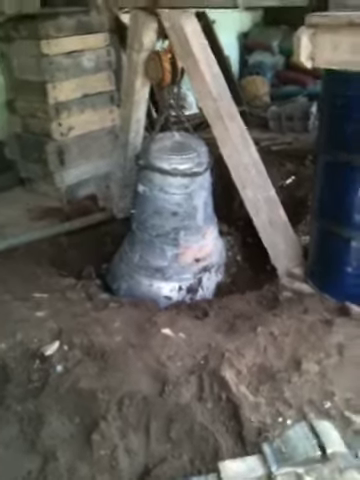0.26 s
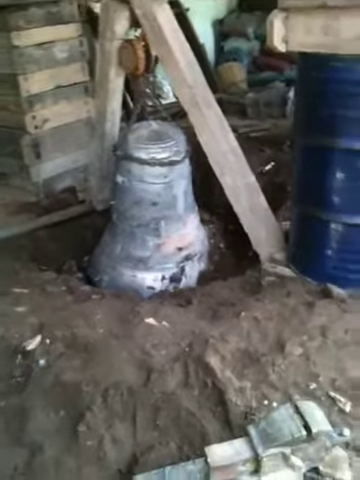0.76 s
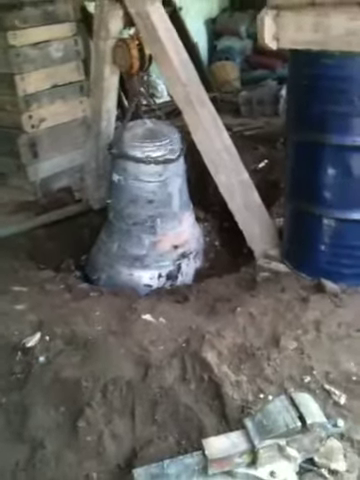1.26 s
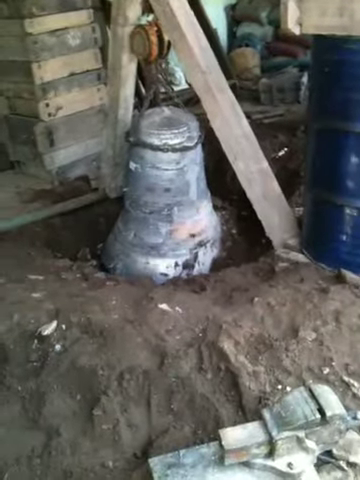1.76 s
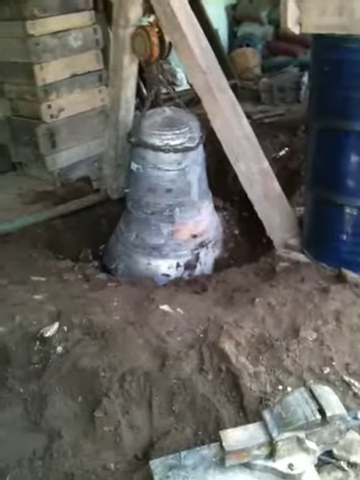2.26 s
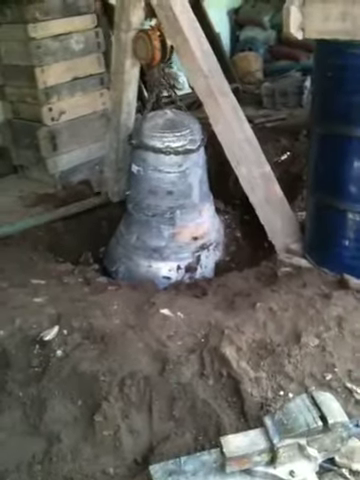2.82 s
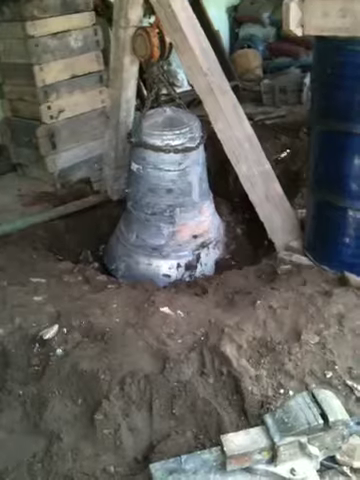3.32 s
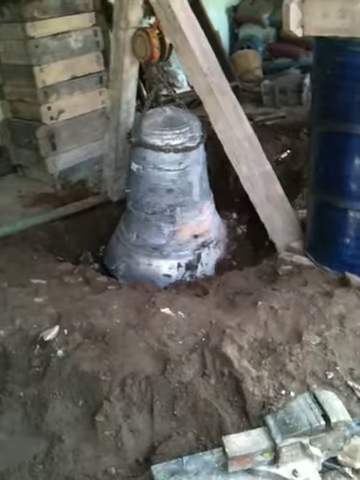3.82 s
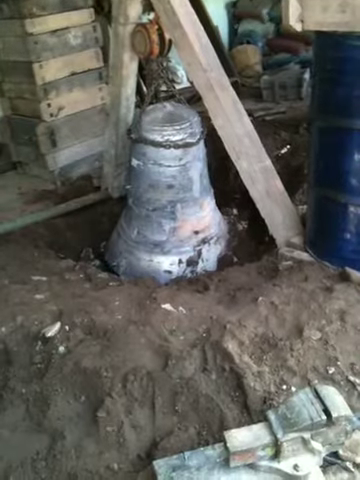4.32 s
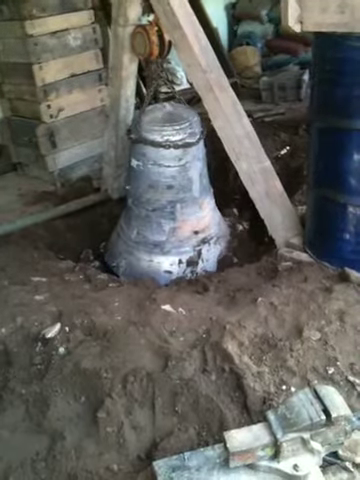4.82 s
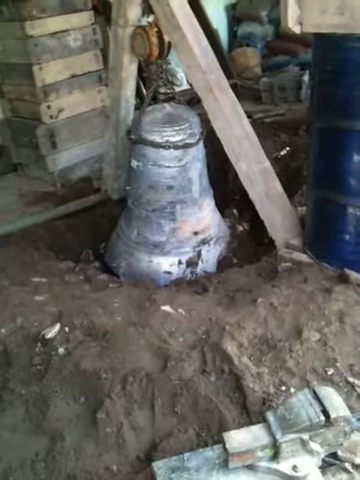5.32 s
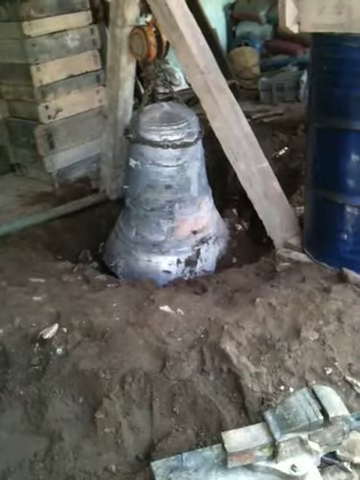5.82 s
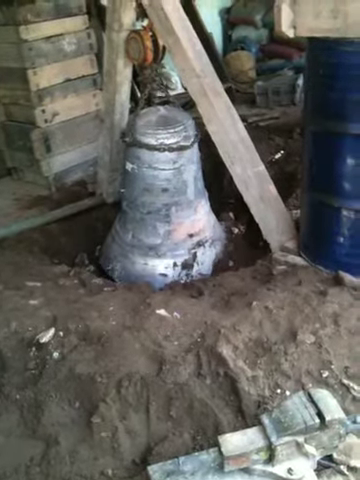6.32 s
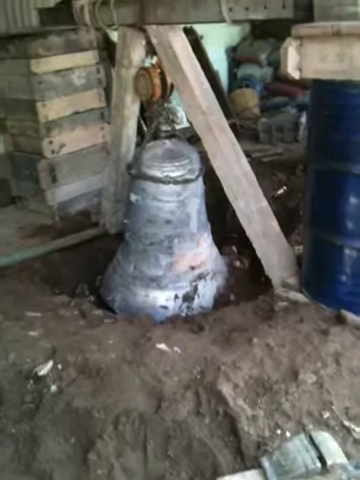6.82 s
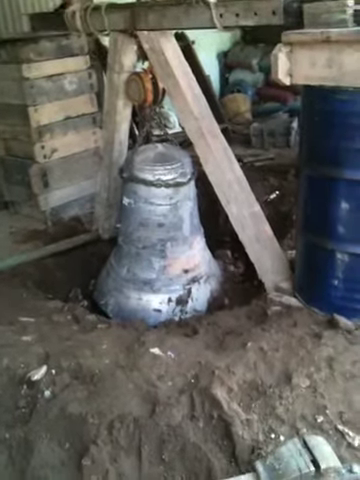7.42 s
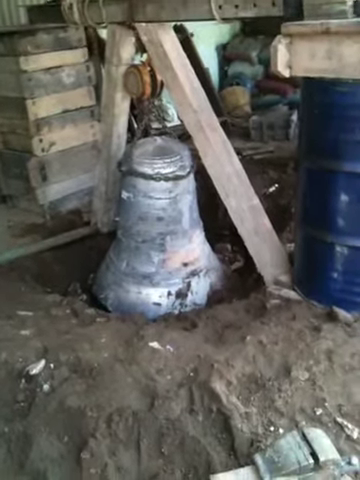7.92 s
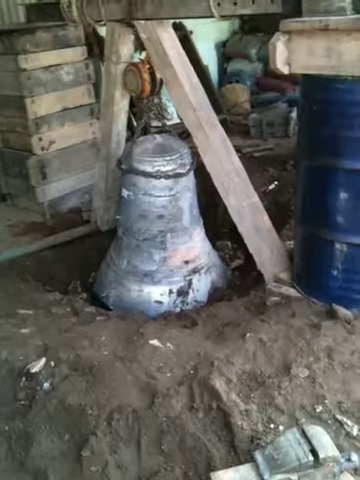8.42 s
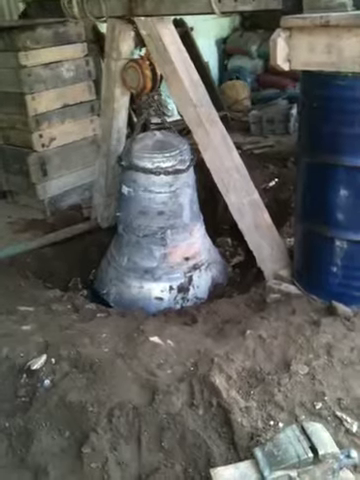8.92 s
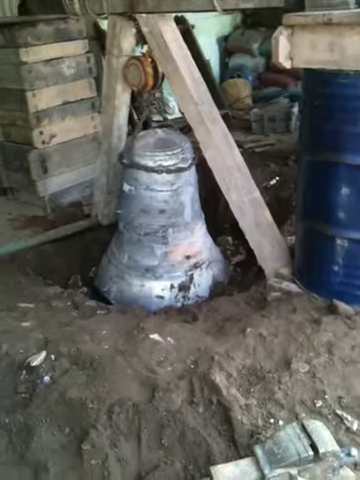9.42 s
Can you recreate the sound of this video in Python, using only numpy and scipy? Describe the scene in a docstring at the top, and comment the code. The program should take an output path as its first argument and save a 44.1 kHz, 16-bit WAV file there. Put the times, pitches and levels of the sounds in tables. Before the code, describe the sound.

Under a roofed work pit, light loose chain clinks come first, then seven short, loud ratcheting rattles of a hand chain through a hoist, roughly one per second. Sharp clanks, ringing links and dull timber knocks fill the gaps. After the last pull the chain settles into sparse, quiet clicks over soft hiss and low hum. One fairly close microphone, mono, with a short shed echo.

```python
"""Hand chain through a hoist

A hand chain is hauled through a hoist in short pulls about a second apart, at a roofed pit.
Random knocks rattle over the wheel and ring the housing; noise bursts clank the loose chain.
Stick-slip knocks and thuds ring the timber frame; a shed of sparse echoes surrounds the hoist.
Below lie filtered-noise hiss, thin tones, a faint squeak and soft bumps on the one microphone."""
import sys
import numpy as np
from scipy import signal
from scipy.io import wavfile
from scipy.ndimage import uniform_filter1d

SR = 44100
rng = np.random.default_rng(int(sys.argv[2]) if len(sys.argv) > 2 else 0)


def to_wav(s):
    """Save 16-bit WAV."""
    ch = np.atleast_2d(s).T  # columns
    pcm = np.round(np.clip(ch, -1, 1) * 32767)  # PCM
    wavfile.write(sys.argv[1], SR, pcm.astype(np.int16))


N = 426006
STEPS = np.arange(0, N / SR + .001, .001)  # coarse clock for the level shapes (s)

# spectrum of the bare link rattle: pitch_hz, relative_db (per Hz)
RATTLE_SPECTRUM = [(150, 6), (400, -41), (800, -4), (1700, -6), (2300, -1.5), (3300, -2), (3900, -4),
                   (5700, -5), (7600, -5), (9000, -7), (13000, -16), (15800, -19.5)]
# resonances of the hoist housing: pitch_hz, width_hz, relative_db
HOUSING_MODES = [(423, 22, -8), (485, 22, -8), (691, 25, -8), (790, 30, -3), (1212, 20, -5), (1353, 25, -8),
                 (2065, 25, -3), (2097, 22, -1), (2150, 25, -3), (2255, 25, -5), (2453, 22, -3),
                 (2562, 25, -6), (2691, 22, -2), (2768, 25, -5), (3146, 25, -6), (3207, 20, -5),
                 (3342, 20, -3), (3457, 25, -6), (4212, 28, -5), (5126, 35, -5), (5502, 35, -6),
                 (5696, 45, -4), (5804, 45, -5), (6637, 50, -5)]
# the housing's thin cover, which rings longest: pitch_hz, width_hz, relative_db
COVER_MODES = [(2087, 5.9, -6), (3342, 13, -7), (5080, 9, -12), (5760, 7.5, -4.5)]
# a free-hanging chain link: pitch_hz, width_hz, relative_db
LINK_MODES = [(2500, 35, -7), (3214, 12, 0), (3350, 18, -5), (3386, 18, -3), (4032, 40, -10),
              (4761, 30, -4), (5090, 30, -7), (8840, 22, -4), (11800, 40, -9)]


def chain():
    """Links knock, bare and clinking; three random knock trains each ring a third of the housing modes."""
    level_db, low_db, top_db = motion()
    unevenness = evened(uniform_filter1d(rng.standard_normal(N), 900))
    level_db = level_db + 1.03 * unevenness  # the chain runs unevenly

    knocks = clicks(per_s=2500, spread_db=-1.0) + 0.62 * clinks()
    bare = evened(coloured(knocks, RATTLE_SPECTRUM)) * gain_of(level_db - 4.5)

    force_db = 1.101 * level_db - 12  # a hard pull rings the housing more than a slack one
    housing = 0
    for first in range(3):
        train = clicks(per_s=700, spread_db=6.0) * gain_of(force_db)
        housing = housing + ring(train, HOUSING_MODES[first::3])
    cover = ring(clicks(per_s=300, spread_db=7.0) * gain_of(force_db - 4), COVER_MODES)

    # many light random touches a second ring the loose link
    touches = clicks(per_s=60, spread_db=5.0) * gain_of(1.064 * level_db - 24.5)
    ticks = ring(touches, LINK_MODES)

    low, middle, top = ranges(bare + housing + cover + ticks, 1260, 4060)
    return gain_of(low_db) * low + middle + gain_of(top_db) * top


def clinks(count=10):
    """Every link has its own set of short partials and is struck at random about 90 times a second."""
    pitches = np.exp(rng.uniform(np.log(600), np.log(15000), (count, 20)))
    total = 0
    for link_hz in pitches:
        partials = [(hz, 60 + 0.0073 * hz, 0) for hz in link_hz]  # higher partials die sooner
        total = total + ring(clicks(per_s=90, spread_db=-0.5), partials)
    return evened(total)


# pulls on the hand chain: grip_s, speed_up_s, ease_s, rattle_db, swing_db, low_end_db, top_end_db,
# frame_shudder_db (all levels relative)
PULLS_ON_CHAIN = [(1.805, 0.07, 0.083, -21, -41.5, -5.5, 1.5, -46),
                  (2.718, 0.089, 0.044, -20, -38.5, -1.5, 2.5, -35),
                  (3.656, 0.091, 0.069, -21.5, -39.5, -1.5, 4, -54),
                  (4.569, 0.11, 0.051, -19, -38.5, -5, 1, -39),
                  (5.5, 0.074, 0.094, -19.5, -37.5, -3, 2, -35.5),
                  (6.415, 0.076, 0.091, -19, -38.5, -4.5, 1.5, -33.5),
                  (7.264, 0.11, 0.078, -21, -40.5, -4.5, 2.5, -32)]
# the slack chain is shaken and settles: peak_s, rise_s, rattle_db, low_end_db, top_end_db (relative)
SLACK_SHAKES = [(0.0, .01, -38, 12, -9), (0.101, 0.033, -47, -17, 3), (0.47, .01, -65, 12, 8),
                (0.88, .08, -56.5, 2, 2), (0.909, 0.0099, -34, 0, -10.5), (1.078, .04, -49.5, 4, -7.5),
                (1.468, 0.0067, -51, -8, 8), (1.729, 0.017, -53, 2, 13), (2.25, 0.027, -58, 6, 13),
                (2.39, .01, -48, 1, 3), (2.48, 0.047, -53, 15.5, -29), (2.55, .01, -49, -8, 8),
                (2.687, 0.014, -28.5, 2.5, 3.5), (3.13, 0.092, -41.5, -1, -1), (3.37, 0.02, -44.5, -3.5, 2),
                (3.622, 0.026, -35.5, 3, 1), (4.06, 0.022, -49, 5, 8), (4.17, 0.077, -47, 10, -1),
                (4.35, 0.0028, -53, 9.5, -8), (4.47, .01, -51, 12, 16), (4.53, 0.026, -30.5, 0, -0.5),
                (4.85, 0.022, -40, 19, 1), (4.961, 0.046, -27.5, -5.5, -8.5), (5.13, 0.018, -41, 5, -7.5),
                (5.33, 0.09, -51, 4.5, 1), (5.45, 0.073, -53, -1, 8), (6.012, .005, -54, 16, 12),
                (6.082, .015, -41.5, 1, -3), (6.35, 0.06, -51.5, 5.5, 4.5), (6.938, 0.081, -39, -5.5, -9),
                (7.12, 0.011, -40.5, 8.5, 1), (7.725, 0.041, -47.5, 16, 6.5), (7.755, 0.012, -59, 5, 13),
                (7.97, 0.039, -45, 3, 0.5), (8.06, .03, -64, -3, 11), (8.13, .03, -51.5, -11, 0),
                (8.209, 0.19, -53, 1, -5), (8.49, .02, -57.5, -4, -8), (8.89, 0.021, -54, 6, 1),
                (9.183, 0.017, -39, 8.5, -5), (9.333, .008, -53, -5, 7), (9.55, .03, -58, 11, -14)]
SHAKE_RISE_DB, SETTLE_DB_PER_S, AT_REST_DB = 13.5, 173, -78


def motion():
    """Pulls and shakes add in power; the loudest lends the rattle most of its low and top colour."""
    shapes = [pull(*row[:5]) for row in PULLS_ON_CHAIN]
    shapes += [swell(*row[:3], SHAKE_RISE_DB, SETTLE_DB_PER_S) for row in SLACK_SHAKES]
    ends_db = [row[5:7] for row in PULLS_ON_CHAIN] + [row[3:] for row in SLACK_SHAKES]
    power = gain_of(shapes) ** 2
    total = power.sum(axis=0) + gain_of(AT_REST_DB) ** 2
    colours = np.transpose(ends_db) @ power / total
    return curve(np.transpose([STEPS, 10 * np.log10(total), *colours]))


# the shape all pulls share; levels are relative to the pull's own rattle level
TAKE_UP_S, TAKE_UP_DB, CATCH_DB, GRIP_DB, EASE_DB = .045, -28, -14.5, -7, -7.5
LET_GO_S, SWING_DB_PER_S = 0.06, 62.5


def pull(s, up_s, ease_s, db, swing_db):
    """Slack is taken up, the wheel catches, the chain speeds up, eases, is let go and swings on (dB)."""
    spans = [-2 * TAKE_UP_S, TAKE_UP_S, TAKE_UP_S, .006, up_s, ease_s, LET_GO_S, 2]
    levels = [-120, db + TAKE_UP_DB, db + CATCH_DB, db + GRIP_DB, db, db + EASE_DB,
              swing_db, swing_db - 2 * SWING_DB_PER_S]
    return np.interp(STEPS, s + np.cumsum(spans), levels)


def swell(s, rise_s, db, rise_db, fall_db_per_s):
    """Climbs to its peak at a rate of rise_db per rise_s, then sinks steadily (dB)."""
    climb = rise_db * (s - STEPS) / max(rise_s, .002)
    return db - np.where(STEPS < s, climb, fall_db_per_s * (STEPS - s))


# single blows of loose chain: start_s, level_db, low_end_db, top_end_db, spot_pitch_hz, spot_db
# (the ends and the spot's note relative to the level)
CHAIN_BLOWS = [(0.1034, -43, 3.5, -10.5, 700, -33), (0.41, -65, 7, -1, 883, 4),
               (0.6195, -58, 4.5, -13, 1020, -6), (0.739, -59.5, 6, -3, 1220, -4),
               (0.816, -52.5, -13, -9, 3370, -14), (0.9058, -35.5, 9, -32, 1120, -0.5),
               (1.4698, -32, -14.5, -21.5, 2720, -21), (1.7253, -44, -19, -12, 3200, -5),
               (1.7722, -42, -1, -12, 764, -7), (1.8075, -22.5, -16, -12.5, 2640, -6.5),
               (2.2329, -33, -6, -26, 755, -17), (2.387, -38.5, -24, -16, 3460, -7),
               (2.4515, -43, -30.5, -10, 3720, 0), (2.4723, -36, -36, -1.5, 3220, 1),
               (2.67, -38, -38, -2.5, 2200, -5), (2.7191, -19, -4, -15, 780, -19),
               (3.082, -28, -9, -11.5, 975, -14), (3.19, -44.5, -2, -25, 1406, 2),
               (3.256, -43, 3.5, -0.5, 890, -5), (3.363, -39, -28, -4, 3385, -3.5),
               (3.601, -31, -33, -13.5, 983, -11), (3.6596, -28.5, 0, -20, 2080, 2),
               (4.0485, -35.5, -26, -11.5, 3420, -2), (4.142, -34.5, -7.5, -8.5, 3440, -5.5),
               (4.346, -28.5, -40.5, 2.5, 3241, 3), (4.5208, -27.5, -13, -13.5, 3400, -8),
               (4.5715, -29.5, -41, -11.5, 3340, 3.5), (4.606, -20, -12, -7, 2450, -4.5),
               (4.9175, -31.5, -8, -28, 3040, -4.5), (5.1285, -26.5, -14.5, -44, 1380, -5),
               (5.153, -26.5, -12, -35, 1393, -18), (5.44, -43.5, -36, -1.5, 3280, -7.5),
               (5.476, -34, -15.5, -11, 1000, -9.5), (5.5069, -12.5, -24, -28, 2070, -20),
               (5.8248, -37, -2, -9, 3330, 3.5), (6.075, -44, -4, -4.5, 2245, -3.5),
               (6.3371, -43.5, -23, 5, 3210, -7), (6.4165, -28, -34.5, -22, 2660, -1.5),
               (6.8114, -40.5, 5, -23.5, 2057, 1), (6.9337, -28, -6, -33, 1439, -1.5),
               (6.958, -37.5, -14, -25, 2045, -2), (7.1098, -28.5, -34, -1, 3360, -5),
               (7.118, -28.5, -52.5, -4, 3236, -4), (7.2675, -25.5, -18, -26, 3290, -0.5),
               (7.3022, -17, -35, -12, 2200, -9), (7.669, -35.5, -8, -10.5, 3370, -11),
               (7.7509, -42, -7, -24, 2065, -6), (7.922, -42.5, -28, -13, 2520, -12),
               (7.9637, -54, -13, 0.5, 2160, -15), (8.05, -53, -19, 0, 3300, -5),
               (8.195, -46.5, -4.5, -17, 2500, -9), (8.8556, -56.5, -16.5, -2, 3460, -2.5),
               (8.8861, -50.5, 3, -25, 790, 7.5), (9.0916, -53.5, 12, -21, 1090, -14),
               (9.18, -40, 2, -1, 753, -10), (9.333, -39.5, -14, -26, 740, -22)]


def clanks():
    """A crack in three ranges, the housing's answer, and a free-hanging link that sharp blows ring most."""
    _, level_db, low_db, top_db, _, _ = np.transpose(CHAIN_BLOWS)
    low = band(blows(CHAIN_BLOWS, level_db + low_db + 7.5, 0.0096), 600, 1700)
    middle = band(band(blows(CHAIN_BLOWS, level_db + 4.5, 0.0031), 1900, 3900), 690, 5000)
    top = band(blows(CHAIN_BLOWS, level_db + top_db + 6.0, 0.011), 2900, 10300)
    housing = gain_of(-28) * ring(low + middle, HOUSING_MODES)
    dullness_db = low_db / 3 - top_db
    link = ring(blows(CHAIN_BLOWS, level_db - dullness_db - 15.5, 0.0071), LINK_MODES)
    return low + middle + top + housing + link


def notes():
    """Every blow lands on another spot, which rings briefly in a cluster with scattered overtones."""
    out, t = np.zeros(N + SR), np.arange(5000) / SR
    spreads = rng.standard_normal((len(CHAIN_BLOWS), 3, 1))
    scatters = rng.random((len(CHAIN_BLOWS), 4, 1))
    for (s, level_db, _, _, hz, spot_db), spread, scatter in zip(CHAIN_BLOWS, spreads, scatters):
        phase = 2 * np.pi * hz * t
        close = np.sin(phase * (1 + 0.03 * spread)).sum(axis=0)
        overtones = np.sin(phase * (1.15 + 1.4 * scatter)).sum(axis=0)
        cluster = np.sin(phase) + 0.32 * close + 0.32 * np.sin(1.49 * phase) + 0.28 * overtones
        decay = gain_of(level_db + spot_db - 60 * t / 0.086)  # 60 dB in 86 ms
        out[round(s * SR):][:len(t)] += decay * cluster * (1 - np.exp(-t / 0.0017))
    return out[:N]


# dull knocks on the frame: start_s, level_db, upper_modes_db (relative to the level)
FRAME_THUDS = [(0.917, -45, -15), (3.029, -24, -2), (3.098, -27, -1), (3.455, -54.5, 13),
               (3.686, -42.5, 20.5), (3.885, -46, 12), (4.029, -39, 2), (4.079, -26.5, -7.5),
               (4.22, -45, 11.5), (7.611, -30, -26), (8.889, -57, 9), (9.191, -66, -6)]
# resonances of the timber legs: pitch_hz, width_hz, relative_db
TIMBER_MODES = [(133, 60, 5.5), (193, 8.3, 6), (214, 49, 11), (258, 68, -6), (349, 28, -12.5),
                (418, 24, -4), (478.3, 8.3, -8), (927, 26, -11.5), (1306, 300, -9.5)]


def frame():
    """Lumpy stick-slip shudder and dull thuds ring the timber legs."""
    slips = ring(clicks(per_s=120, spread_db=-0.5), TIMBER_MODES)
    shudder = evened(slips) * gain_of(strain() - 0.5)
    _, level_db, upper_db = np.transpose(FRAME_THUDS)
    low = ring(blows(FRAME_THUDS, level_db - 3, 0.003), TIMBER_MODES[:4])
    high = ring(blows(FRAME_THUDS, level_db + upper_db - 2, 0.017), TIMBER_MODES[4:])
    return shudder + low + high


# the frame groans as the load shifts: peak_s, rise_s, level_db (relative)
LOAD_GROANS = [(0.0, .01, -38.5), (0.4, 0.022, -48.5), (0.94, 0.034, -41.5), (1.18, .08, -56),
               (1.48, 0.045, -56), (2.04, 0.19, -32.5), (2.26, 0.062, -41), (2.53, 0.25, -47),
               (3.04, 0.022, -29.5), (3.25, 0.12, -34), (3.45, 0.082, -50), (4.09, 0.28, -29.5),
               (4.28, 0.11, -36.5), (4.87, 0.091, -38), (5.2, 0.18, -52), (5.81, 0.076, -40),
               (6.88, 0.32, -49), (7.64, 0.021, -33), (8.0, 0.16, -60), (8.91, .05, -45.5), (9.2, .03, -39),
               (9.63, 0.22, -55)]
GROAN_RISE_DB, GROAN_DB_PER_S, SHUDDER_RISE_S, FRAME_REST_DB = 15, 128, 0.059, -63


def strain():
    """The frame shudders near the height of every pull and groans in between (dB)."""
    shudders = [(s + up_s, SHUDDER_RISE_S, db) for s, up_s, *_, db in PULLS_ON_CHAIN]
    power = gain_of(FRAME_REST_DB) ** 2
    for row in [*LOAD_GROANS, *shudders]:
        power = power + gain_of(swell(*row, GROAN_RISE_DB, GROAN_DB_PER_S)) ** 2
    return curve(np.transpose([STEPS, 10 * np.log10(power)]))[0]


# soft knocks on the microphone's body: start_s, level_db (relative)
MICROPHONE_BUMPS = [(1.145, -47), (1.153, -47), (1.177, -41), (1.211, -41), (1.243, -49), (1.269, -46.5),
                    (1.298, -52), (1.449, -50), (1.466, -43), (1.547, -52), (1.591, -53)]


def bumps():
    """Each knock is two or three low cycles that swell and die, with no echo."""
    out, t = np.zeros(N), np.arange(1200) / SR
    shape = np.sin(2 * np.pi * 170 * t) * t / 0.0023 * np.exp(1 - t / 0.0032)
    for s, db in MICROPHONE_BUMPS:
        out[round(s * SR):][:len(t)] += gain_of(db) * shape
    return out


# path of a faint falling squeak: time_s, pitch_hz, level_db
SQUEAK_PATH = [(8.47, 5430, -97), (8.55, 5250, -70.5), (8.7, 4860, -70), (8.82, 4570, -95)]


def squeak():
    """A thin gliding tone made fuzzy by multiplying it with smoothed noise."""
    hz, db = curve(SQUEAK_PATH)
    fuzz = evened(uniform_filter1d(rng.standard_normal(N), 60))
    return gain_of(db) * fuzz * np.sin(2 * np.pi * np.cumsum(hz) / SR)


# spectrum of hiss and rumble: pitch_hz, relative_db (per Hz)
AIR_SPECTRUM = [(15, -84), (25, -86), (86, 2.5), (255, -15.5), (291, 3.5), (637, -10), (2810, -14),
                (3300, -15.5), (3990, -18), (4950, -16.5), (6850, -18), (15800, -26.5)]
AIR_DB = -65
# thin wavering tones: pitch_hz, level_db (before the course below)
HUM_TONES = [(100, -93.5), (298, -65.5), (15050, -75)]
# course of the tones' level: time_s, added_db
HUM_COURSE = [(0, -1.5), (7.9, -0.5), (8.3, -5), (9.66, -7)]


def air():
    """Filtered-noise hiss and distant rumble swell a little, with tones wavering in level and phase."""
    drift = evened(uniform_filter1d(rng.standard_normal(N), 6000))
    out = evened(coloured(rng.standard_normal(N), AIR_SPECTRUM)) * gain_of(AIR_DB + 0.81 * drift)
    t = np.arange(N) / SR
    course_db = curve(HUM_COURSE)[0]
    for hz, db in HUM_TONES:
        wander = evened(uniform_filter1d(rng.standard_normal(N), 5000))
        tone = np.sin(2 * np.pi * hz * t + 0.87 * wander)
        out = out + gain_of(db + course_db + 4.4 * wander) * tone
    return out


# how long the shed's echo lasts: pitch_hz, fall_by_60_db_s
SHED_DECAY = [(150, 0.81), (500, 0.74), (1400, 0.47), (3700, 0.4), (9700, 0.35)]


def shed(x):
    """Sparse echoes of random sign, each range dying at its own speed."""
    taps = np.zeros(SR)
    at = np.arange(200, SR - 20, 20)
    taps[at + rng.integers(0, 20, len(at))] = rng.choice([-1., 1.], len(at))
    hz, t, z = signal.stft(taps, SR, nperseg=256)
    f, t60 = np.transpose(SHED_DECAY)
    fade = gain_of(-60 * t / np.interp(hz, f, t60)[:, None])
    tail = signal.istft(z * fade, SR, nperseg=256)[1]
    return signal.oaconvolve(x, tail / np.linalg.norm(tail))[:N]


def clicks(per_s, spread_db):
    """Random knocks of either sign and exponentially scattered level, evened to rms 1."""
    size = gain_of(spread_db * np.minimum(rng.exponential(1, N), 3)) * rng.choice([-1., 1.], N)
    return evened(size * (rng.random(N) < per_s / SR))


def blows(rows, column_db, length_s):
    """A short dying noise burst at each row's time."""
    out, t = np.zeros(N + SR), np.arange(2000) / SR
    envelope = np.exp(-t / length_s) * (1 - np.exp(-t / 0.00093))
    bursts = rng.standard_normal((len(rows), len(t))) * envelope
    for row, db, burst in zip(rows, column_db, bursts):
        out[round(row[0] * SR):][:len(t)] += gain_of(db) * burst
    return out[:N]


def ring(x, modes):
    """A body: each (Hz, width Hz, dB) mode rings on after every push; wide modes die fast."""
    t = np.arange(0, min(1 / 3, 2.5 / min(m[1] for m in modes)), 1 / SR)
    body = 0
    for hz, width, db in modes:
        tone = np.exp(-np.pi * width * t) * np.sin(2 * np.pi * hz * t)
        body = body + gain_of(db) * tone * np.sqrt(width)  # wide and narrow modes equally strong
    return signal.oaconvolve(x, body)[:len(x)] * np.sqrt(4 * np.pi / SR)


def coloured(x, points):
    """Filters by a (Hz, dB) spectrum with causal minimum phase."""
    f, db = np.transpose(points)
    hz = abs(np.fft.fftfreq(8192, 1 / SR))
    level_db = np.interp(np.log(hz + 1), np.log(f + 1), db)
    log_gain = np.log(gain_of(np.maximum(level_db, -100)))
    taps = np.fft.ifft(np.exp(np.conj(signal.hilbert(log_gain)))).real[:4096]
    return signal.oaconvolve(x, taps)[:len(x)]


def band(x, lo_hz, hi_hz):
    """Band-pass."""
    return signal.sosfilt(signal.butter(2, [lo_hz, hi_hz], "band", fs=SR, output="sos"), x)


def ranges(x, low_hz, top_hz):
    """Splits into low, middle and top parts that add up to the whole."""
    low = signal.oaconvolve(x, signal.firwin(127, low_hz, fs=SR), "same")
    below = signal.oaconvolve(x, signal.firwin(127, top_hz, fs=SR), "same")
    return low, below - low, x - below


def curve(rows):
    """Table columns after the time, one value a sample."""
    s, *columns = np.transpose(rows)
    return [np.interp(np.arange(N) / SR, s, c) for c in columns]


def evened(x):
    """Scales to rms 1."""
    return x / np.sqrt(np.mean(x ** 2) + 1e-20)


def gain_of(db):
    """Decibels to a factor."""
    return 10 ** (np.asarray(db) / 20)


def scene():
    """Metal, timber and echo are thinned of deep bass together, then laid over the air."""
    rattle, hits, spots, wood = chain(), clanks(), notes(), frame()
    metal_send = gain_of(-6) * rattle + gain_of(0.5) * hits + gain_of(-0.5) * spots
    echo = shed(metal_send + gain_of(-10.5) * wood)
    hoist = band(band(rattle + hits + spots + wood + echo, 234, 16000), 150, 21000)
    mix = hoist + air() + squeak() + bumps()
    return np.array([mix, mix])  # one microphone: both channels alike


EDGE_HZ = 15850  # upper band limit


def record(dry):
    """The microphone's bass roll-off, then the band limit."""
    thin = signal.sosfilt(signal.butter(2, 45, "high", fs=SR, output="sos"), dry)
    limit = signal.firwin(1023, EDGE_HZ, window=("kaiser", 11), fs=SR)
    return signal.oaconvolve(thin, limit[None], "same")


dry = scene()
out = record(dry)
to_wav(out)
```